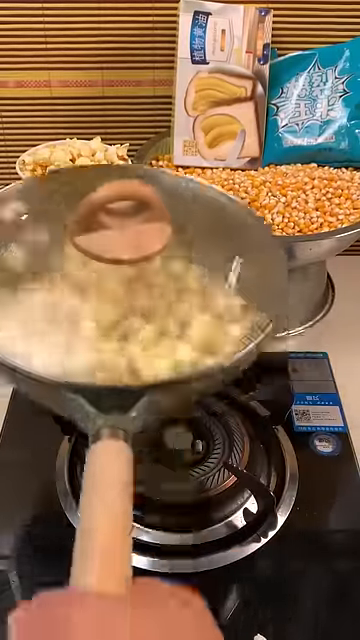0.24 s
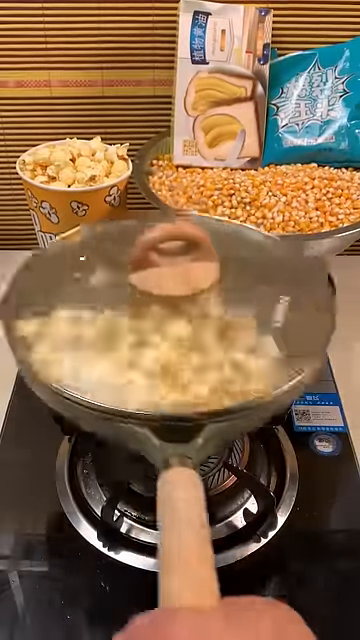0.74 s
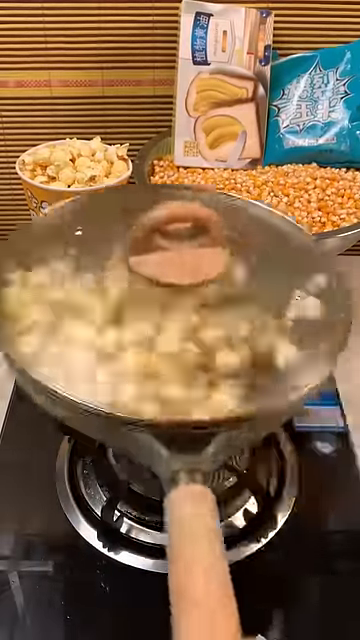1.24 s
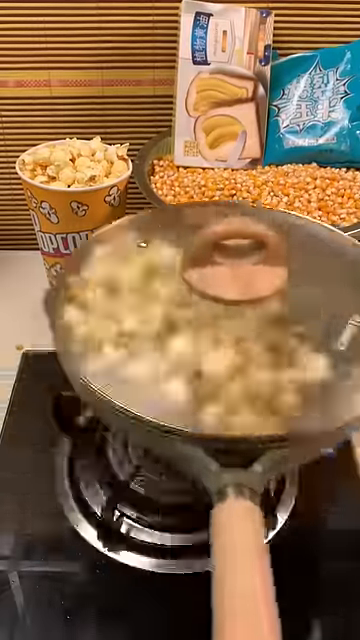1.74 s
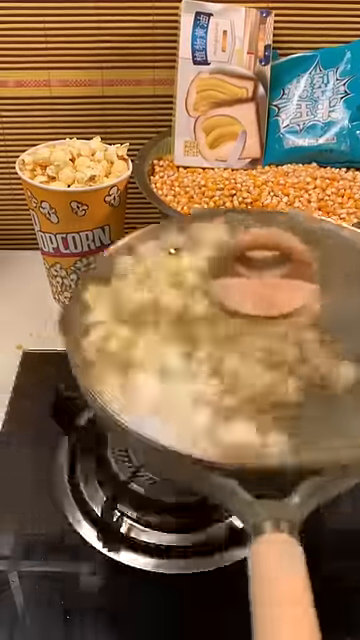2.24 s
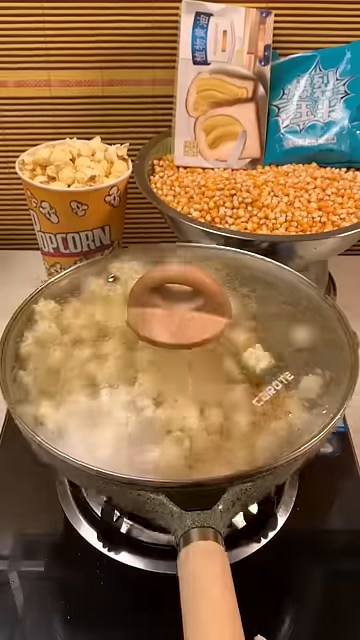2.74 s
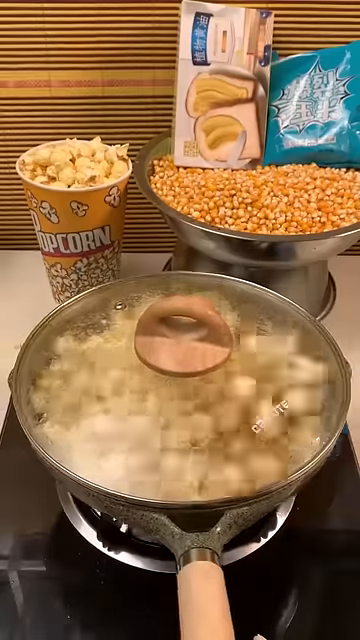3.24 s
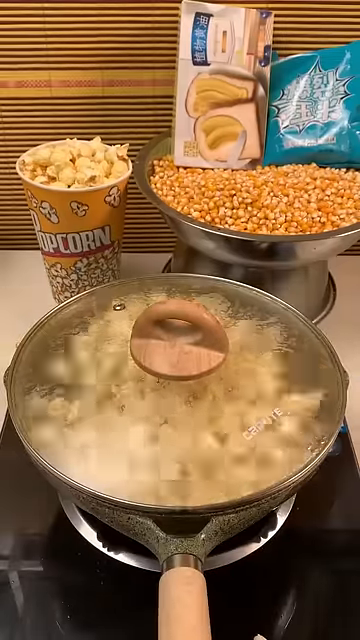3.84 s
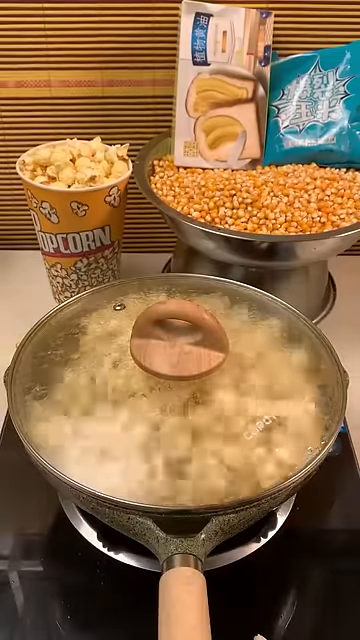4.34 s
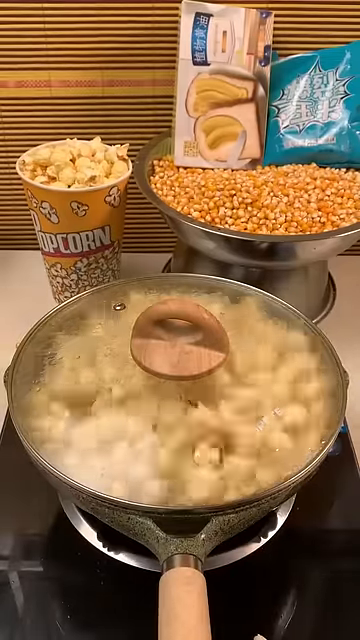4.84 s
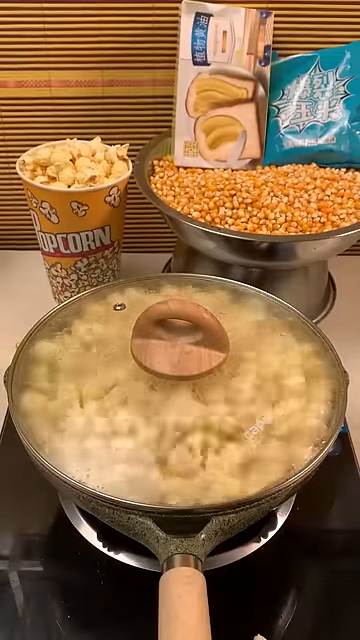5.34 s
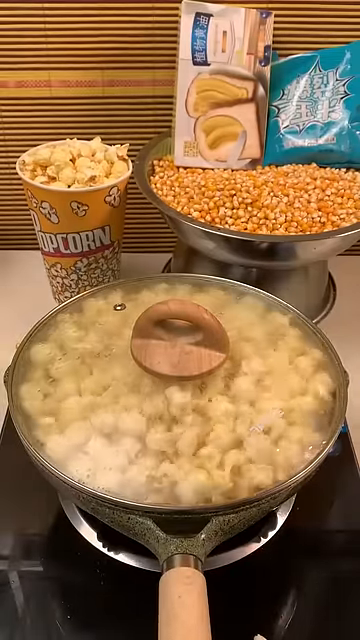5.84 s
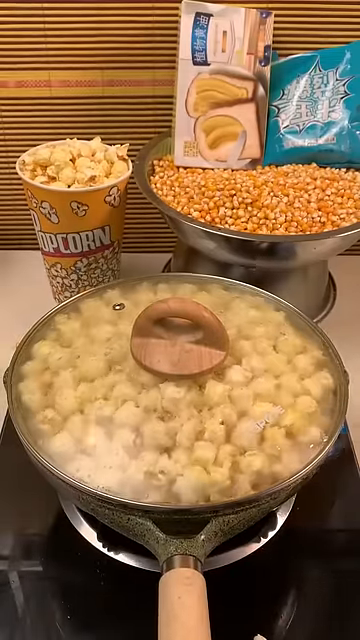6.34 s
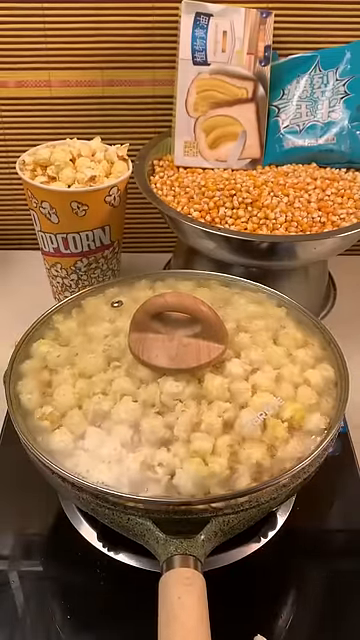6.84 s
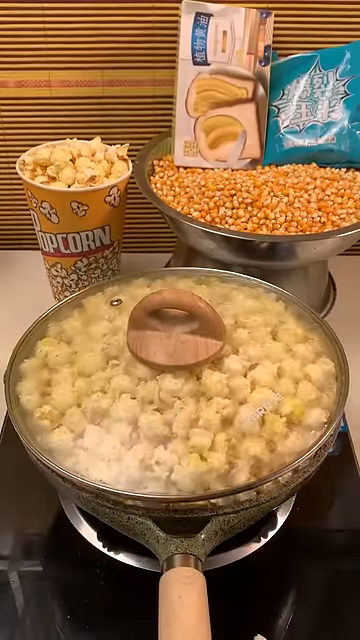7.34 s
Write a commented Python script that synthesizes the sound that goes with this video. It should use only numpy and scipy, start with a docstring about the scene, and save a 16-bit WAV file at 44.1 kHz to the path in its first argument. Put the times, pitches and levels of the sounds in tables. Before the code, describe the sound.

Popcorn bursts in hot oil under a pan lid, sharp scattered pops and a metallic bang thickening into dense, thumping crackle.

```python
"""A small kitchen, close by the hob, one channel: popcorn pops in hot oil in a frying pan under a glass lid.
The pan is shaken, bangs on the burner grate and is put down; then the popping thickens over a low gas flame.
Pops are shaped noise bursts through pan and lid resonances; each also kicks the pan with a few low cycles.
Thumps are sinking sines, knocks narrow noise, taps a lid mode; oil and steam are random ticks over hiss.
As corn covers the bottom, then packs against the lid, pops grow longer and the lighter thumps rise in pitch."""
import sys
import numpy as np
from scipy import signal
from scipy.fft import rfft, irfft, next_fast_len
from scipy.io import wavfile
from scipy.ndimage import uniform_filter1d, map_coordinates

SR = 44100
rng = np.random.default_rng(int(sys.argv[2]) if len(sys.argv) > 2 else 0)


def waveform_to_disk(signal):
    """Save audio, clipped to [-1, 1], as 16-bit WAV at the path in sys.argv[1]."""
    frames = np.transpose(np.atleast_2d(signal))
    scaled = np.clip(frames, -1, 1) * 32767
    samples = np.round(scaled).astype(np.int16)
    wavfile.write(sys.argv[1], SR, samples)


N = 334278  # length in samples

# Event and bed levels below are before the gain of their layer, which scene() sets.

# How slowly varying levels lie between the pops.
# Each row: time in seconds, tumbling corn in dB, frying oil in dB, steam in dB.
SIMMER = [(0, -62.5, -51, -55), (0.4, -62.5, -48, -49.5), (0.56, -62, -47.5, -54), (0.7, -65, -56, -49.5),
          (1.102, -62, -62, -57), (1.7, -62, -42.5, -47.5), (2.25, -67, -47.5, -48.5),
          (2.83, -63, -45, -48), (2.98, -71, -55.5, -62), (3.15, -70, -62, -58), (3.451, -46.5, -45.5, -56),
          (3.75, -93, -50, -52.5), (4.06, -81, -62, -55), (4.2, -63, -48, -45.5), (4.75, -50, -55, -48.5),
          (5.45, -47.5, -57, -49.5), (5.8, -52.5, -53.5, -49), (5.93, -62, -57, -47),
          (6.15, -37, -47.5, -41.5), (6.37, -47, -64, -49.5), (6.5, -37, -47, -44), (6.75, -39.5, -51, -52),
          (7.33, -38.5, -66, -54), (7.58, -40, -72, -72)]
# Shakes slide the corn through the hot oil. Each row: centre in seconds, half length in seconds, sizzle in dB.
SLIDES = [(0.274, 0.061, -44), (0.797, 0.07, -39), (1.228, 0.05, -42), (1.417, 0.3, -43),
          (1.888, 0.062, -41), (2.402, 0.078, -56), (2.567, 0.06, -44.5)]
# The heap heaves, rumbles and lets out steam.
# Each row: peak in seconds, decay in seconds, rumble in dB, steam in dB.
HEAVES = [(0.965, 0.058, -35, -44), (3.232, 0.062, -35.5, -42.5), (3.39, 0.04, -47, -62),
          (3.892, 0.055, -37.5, -41.5), (4.12, 0.04, -46, -45.5), (4.551, 0.078, -44, -56),
          (4.976, 0.067, -36.5, -37.5), (5.13, 0.13, -52, -31.5), (6.436, 0.037, -33, -33)]
# The clearest bursting kernels. Each row: time in seconds, crack level in dB, lid ring in dB re the crack,
# steam hiss in dB re the crack, flake pitch in Hz.
POPS = [(0.067, -33.5, -0.5, -11, 3180), (0.1204, -27, 3.5, 6, 2600.0), (0.246, -23, 1.5, -13.5, 6050),
        (0.305, -32, -2, -5, 3100), (0.349, -34.5, -12, 1, 4560), (0.395, -39, -21, -9, 3300.0),
        (0.424, -44, 2, 11, 3830), (0.5019, -22.5, -9.5, -17, 3500), (0.778, -36, 2, 4, 3060),
        (1.182, -24.5, -12, 1.5, 4240), (1.2145, -22, -18, 1, 4830), (1.3609, -17.5, -5.5, 2.5, 5750),
        (1.473, -33, -4, 0, 3200.0), (1.603, -42.5, 2, 12.5, 2900.0), (1.6364, -29, -20, 2.5, 3860),
        (1.6729, -25.5, -10, 2, 4500.0), (1.7572, -15, -3, -1, 3980), (1.796, -28, -3, 2, 6800),
        (1.844, -24.5, -2, 3, 2920), (2.121, -32.5, -12, 3, 5870), (2.247, -30.5, -1.5, 4.5, 5230),
        (2.321, -30, -6, 1, 3870), (2.342, -31, -16, -15, 3230), (2.487, -35, -22, 7, 6900),
        (2.534, -36, 4.5, 7, 3700.0), (2.694, -32.5, 3.5, 4, 6660), (2.761, -33, 4, -4, 3200.0),
        (2.861, -30, -12, 5, 5300), (3.0241, -38.5, -21, 10.5, 7300), (3.21, -31.5, -1, -26, 3160),
        (3.2314, -44, 12, -16.5, 2800.0), (3.273, -34.5, 5.5, -2, 2600.0), (3.365, -37, 0, 5, 4000.0),
        (3.4012, -33.5, 1, 4, 5530), (3.47, -38.5, 4, -2, 4000.0), (3.544, -40, 1, 12, 5270),
        (3.623, -35.5, -5.5, 5.5, 3940), (3.753, -45, 10, 10, 2530), (3.857, -38.5, 7, 6.5, 3180),
        (3.872, -36, 4, -3, 2520), (3.8955, -35.5, 5, -1, 5970), (3.9426, -37, 4, 11, 2250),
        (4.014, -43.5, 7, 15, 3140), (4.121, -39, 0, -10, 5440), (4.224, -43, 2, 19, 4730),
        (4.2784, -43, 14.5, 7, 3620), (4.385, -45.5, 8.5, 12.5, 5530), (4.542, -46.5, 12.5, 16, 2300.0),
        (4.584, -39, 7.5, 9, 7250), (4.604, -35.5, 3.5, -3, 5540), (4.638, -41, -5, 13.5, 6150),
        (4.682, -46, 9, 4, 7200.0), (4.736, -39, -3, 3, 2430), (4.765, -42, 10.5, -2, 6040),
        (4.837, -46.5, 12, 12, 7200.0), (4.858, -34.5, -4, -2, 2570), (4.895, -42, 4.5, 8, 7260),
        (4.964, -38.5, -5, 10, 3750), (5.021, -38, 1, 9, 6800), (5.112, -36, -5.5, 5, 6900),
        (5.143, -39.5, 7.5, 9, 7160), (5.308, -37, 5, 8, 3850), (5.357, -39, 6.5, 5.5, 6950),
        (5.38, -46, -15, 17, 6930), (5.4715, -35, -16, 0, 3700), (5.5979, -38, 5, 12.5, 4750),
        (5.837, -43, 9.5, 10.5, 7300), (5.859, -36, 1.5, 1, 7300), (6.0889, -33.5, -8, 4.5, 6460),
        (6.1282, -28.5, -4, 2, 2450), (6.215, -34, 2, 2, 7340), (6.257, -26, -5.5, -4, 3660),
        (6.279, -36, 5, 4, 3630), (6.297, -34.5, 7, -5, 5160), (6.439, -26.5, 1, -3, 3900),
        (6.4674, -29, -0.5, -15, 2390), (6.497, -30.5, 4, -14, 6200), (6.552, -36, 8, -1, 4380),
        (6.621, -28, -1, -4, 4930), (6.663, -27, -8, -5.0, 4970), (6.673, -26.5, 2, -9.0, 2460),
        (6.718, -27, -0.5, -13, 2500), (6.751, -31, 7, -0.5, 2500), (6.7968, -26.5, 5, -11, 6600),
        (6.835, -33, 5.5, 0.5, 5700.0), (6.873, -43, 10, 11.5, 4424), (6.891, -31, 7.5, -12, 4930),
        (6.917, -39, 10.5, 8.5, 5100.0), (6.936, -24.5, -1.5, -7.5, 2370), (6.992, -32.5, -6, -5, 5200.0),
        (7.014, -32, 11, -3.5, 4630), (7.026, -27, -2, -22, 2830), (7.041, -31.5, 8, 0, 5400),
        (7.055, -40, 7, -16, 5100.0), (7.072, -34, -8, -5, 6500), (7.092, -31.5, 3.5, -6, 4050),
        (7.146, -37, 4.5, -7, 3040), (7.169, -30.5, 1, -10, 3300), (7.2139, -36, 6, -4, 4840),
        (7.2384, -31, 0, -8, 2940), (7.282, -37, 0, 0, 2398), (7.298, -26, 0.5, -10, 6200),
        (7.312, -30.5, 0, 0.5, 5100), (7.3272, -31.5, 2, -5, 4460), (7.354, -41.5, 7, -3, 6900.0),
        (7.3914, -32, 0.5, 0, 5900), (7.454, -37, -30, 1.5, 5060), (7.494, -35.5, 7, 4.5, 5000),
        (7.54, -41.5, 9.5, 10.5, 4900.0), (7.567, -32, 2.5, -8, 3340)]
# Heavy thumps: corn thrown against pan and lid, and from 0.91 to 0.97 s the pan's blows on the grate. Each row:
# time in seconds, level in dB, initial pitch in Hz.
THUMPS = [(0.256, -26.5, 187.5), (0.286, -47, 157), (0.503, -51, 205), (0.913, -29, 385),
          (0.935, -32.5, 245), (0.956, -26.5, 272), (0.969, -32, 205), (1.21, -40, 173),
          (1.367, -39.5, 198), (1.392, -41, 208), (1.421, -41, 165), (1.479, -38, 192), (1.619, -32.5, 193),
          (1.657, -39.5, 211), (1.678, -36, 217), (1.824, -36.5, 243), (1.85, -35, 213), (1.88, -36.5, 211),
          (2.017, -44, 202), (2.327, -33.5, 214), (2.543, -34, 192), (2.763, -28.5, 243), (2.781, -36, 186),
          (3.213, -36, 246), (3.233, -30.5, 369), (3.318, -41.5, 296), (3.348, -31, 248), (3.416, -37, 239),
          (3.629, -38, 188), (3.652, -38.5, 225), (3.901, -33.5, 221), (3.93, -30, 236), (4.124, -35, 245),
          (4.27, -35.5, 226), (4.364, -39, 232), (4.39, -36.5, 203), (4.427, -36, 203), (4.506, -35, 245),
          (4.544, -34.5, 180), (4.583, -36, 319), (4.661, -34.5, 251), (4.751, -35, 213), (4.807, -33, 261),
          (4.918, -36, 213), (4.945, -40, 263), (4.985, -35.5, 305), (5.081, -37, 186), (5.144, -29, 287),
          (5.169, -30.5, 238), (5.213, -33.5, 210), (5.245, -44, 242), (5.285, -35, 274.5),
          (5.458, -32.5, 306), (5.579, -38, 303), (5.745, -38, 231), (5.839, -29.5, 233),
          (5.955, -31.5, 271), (5.986, -32.5, 251), (6.018, -37, 328), (6.052, -36, 167), (6.185, -40, 287),
          (6.211, -28, 285), (6.29, -27.5, 349), (6.34, -35.5, 254), (6.411, -33, 350), (6.435, -27, 384),
          (6.467, -27, 365), (6.5, -28, 356), (6.573, -34, 384), (6.604, -25, 421), (6.623, -23.5, 474),
          (6.668, -34, 550), (6.755, -36, 519), (6.796, -33, 509), (6.82, -34, 450), (6.848, -36, 472),
          (6.9, -37, 402), (6.992, -29.5, 366), (7.013, -22.5, 536), (7.05, -36.5, 485),
          (7.208, -31.5, 300), (7.252, -38, 247), (7.37, -25.5, 489), (7.395, -35, 440),
          (7.487, -32.5, 461.8), (7.568, -33, 401)]
# Hollow knocks of the pan and its loose lid. Each row: start in seconds, level in dB, pitch in Hz.
KNOCKS = [(0.12, -33, 1710), (0.245, -28, 1960), (0.894, -32, 1140), (0.905, -21.5, 1410),
          (1.182, -28.5, 1410), (1.399, -27, 1220), (1.492, -26, 780), (1.872, -24.5, 1160),
          (2.599, -33, 880), (2.675, -36.5, 890), (3.233, -27, 1100), (3.244, -23.5, 590),
          (3.411, -31, 1270), (3.49, -38, 720), (4.192, -35, 820), (4.307, -39.5, 840), (4.454, -27, 1490),
          (4.978, -27, 1090), (5.166, -28, 704), (5.31, -32.5, 1100), (5.542, -34.5, 930),
          (5.705, -32.5, 736), (5.729, -37, 1110), (5.95, -26.5, 1090), (5.978, -29, 1040),
          (6.465, -21.5, 1220), (6.618, -23, 1220), (7.17, -22.5, 1290), (7.366, -31, 603)]
# Flying flakes strike the lid and ring one of its modes. Each row: start in seconds, level in dB, pitch in Hz.
TAPS = [(0.498, -34, 1123), (1.755, -28, 1880), (1.873, -26.5, 1070), (2.243, -39, 1880),
        (2.534, -40, 1130), (2.857, -38, 1132), (3.621, -28.5, 1884), (4.753, -34.5, 1850),
        (4.992, -37, 1160), (5.236, -38, 1766), (5.44, -34, 1780), (5.601, -37, 1720), (6.121, -32, 1080),
        (6.139, -31, 1050), (6.17, -33, 1720), (6.273, -33, 1066), (6.371, -38.5, 1700), (6.408, -33, 1080),
        (6.449, -27, 1130), (6.6, -30, 1180), (6.668, -26.5, 1195), (6.741, -29, 1960), (7.224, -30, 1250),
        (7.244, -31, 1177), (7.483, -33, 1220)]
# The pan meets the grate: a chattering bang, later the putting down. Each row: start in seconds, level in dB.
BANG = [(0.893, -32), (0.907, -22), (0.913, -20), (0.918, -27), (0.925, -19), (0.939, -28), (0.953, -29.5),
        (3.213, -39), (3.233, -45)]
# Corn filling the pan lowers the resonances that colour the pops. Each row: time in seconds, frequency ratio.
FILL = [(0, 0.95), (3.6, 0.94), (4.6, 0.93), (6.2, 0.917), (6.7, 0.89)]

# Resonances of the lidded pan, before the fill ratio. Each row: centre in Hz, width in Hz, level in dB.
PAN_MODES = [(1220, 41, 4.5), (1942.6, 170, 3.5), (2570, 89, -2.5), (3310, 130, -3.5), (3876, 160, -2.5),
             (4596, 143, -4.5), (5156, 100, -7.5), (5510, 206, -6), (6770, 250, -4.5), (7770, 250, -8),
             (8390, 360, -2), (9510, 250, -3), (10930, 1100, -4.5), (12360, 810, -5), (13900, 300, -10)]
# Modes of the hob's sheet, scattered at each contact. Each row: mean pitch in Hz, level in dB.
HOB_MODES = [(198, -4), (325, -14), (395, -4.5), (495, -10.5)]
# Where flakes tap the lid. Each row: centre in Hz, width in Hz, gain in dB for the squared resonance.
LID_MODES = [(1110, 78, -5.5), (1758, 260, 10), (3280, 62, -11)]
# Relative spectra. Each row: frequency in Hz, level in dB.
# Sound going straight out past the lid:
DIRECT_SPECTRUM = [(300, -19), (750, -65), (1100, -2.5), (2200, -13), (4000, -13.5), (6000, -8),
                   (10000, -11.5), (15500, -11.5)]
# The grate rattling on:
RATTLE_SPECTRUM = [(1000, -2), (2500, -2), (5000, 1), (6500, 9), (8300, 5), (10000, -20), (15000, -27)]
# The pan touching the grate:
GRATE_SPECTRUM = [(290, -35), (500, -3), (1160, -14), (1400, -22), (2130, -14.5), (3200, -4), (3700, -13),
                  (8210, -4), (14000, -12), (15100, -14), (16000, -45)]
# Frying oil, before the lidded pan colours it:
OIL_SPECTRUM = [(500, -34), (780, -1), (1100, -2), (1450, 1.5), (1850, 2), (2200, -5), (2550, 6),
                (3300, 10.5), (5000, 5.5), (6500, 7), (9000, -2.5), (14000, -19)]
# Escaping steam, before the lidded pan colours it:
STEAM_SPECTRUM = [(3000, -86), (5800, -10.5), (7500, 3), (9000, -4), (10500, 3), (13500, -8), (15500, 7)]
# The rush of the gas flame:
BURNER_SPECTRUM = [(15, -45), (30, -30), (48, 8), (61, 8.5), (75, 1), (120, 0), (250, -44), (600, -24),
                   (1500, -29), (6000, -90)]
# Decay of the kitchen's tail. Each row: frequency in Hz, time to fall by 60 dB in seconds.
KITCHEN_DECAY = [(150, 0.22), (500, 0.17), (2000, 0.21), (6000, 0.14), (10000, 0.18), (15000, 0.11)]

# What changes as the pan fills. Each row: value for a bare, a covered and a packed pan.
# Length scale of a pop, in seconds:
POP_LENGTH_S = (0.00422, 0.00681, 0.0085)
# How abruptly a pop ends (exponent, higher is more abrupt):
TAIL_SHAPE = (0.62, 0.75, 0.9)
# Direct sound out of the pan, in dB:
DIRECT_DB = (-2, -0.5, 5.5)
# A pop's ring in the lid's upper mode, in dB re that pop's crack and ring levels:
LID_RING_DB = (-11, -6.5, -7)
# Mean pitch of that mode, in Hz:
LID_UPPER_HZ = (1882, 1828, 1920)
# Small pops a second:
SMALL_POPS_PER_S = (4, 12, 16)
# Mean level of small pops, in dB:
SMALL_POP_DB = (-50, -49.5, -48)
# Lid ring of small pops, in dB re their crack:
SMALL_RING_DB = (1, 7, 4)
# Steam hiss of small pops, in dB re their crack:
SMALL_HISS_DB = (-8, 8, 3)
# Push of a strong pop on the pan, in dB:
KICK_DB = (-56, -39, -39.5)
# Light thumps a second:
LIGHT_THUMPS_PER_S = (4, 12, 20)
# Central pitch of kicks and light thumps, in Hz:
THUMP_HZ = (204, 303, 460)

# popped corn first covers the bottom of the pan, later packs against the lid
COVER_FROM_S, COVER_TAKES_S = 2.2, 1.36
PACK_FROM_S, PACK_TAKES_S = 6.33, 0.328
SLIDE_CORN_DB, SLIDE_STEAM_DB = -24, -3  # re the sizzle
HEAVE_ATTACK_S, HEAVE_OIL_DB = 0.043, -1  # the oil spits, re the rumble
# scatters of pitch are in natural-log units
SMALL_FLAKE_HZ, FLAKE_SCATTER = 4010, 0.52
THUMP_SCATTER, LIGHT_THUMP_DB = 0.229, -5.5  # level re the tumbling corn
# first snap of a hull: its level scale, and the pop length over which it fades
SNAP_DB, SNAP_LENGTH_S = 6, 0.0025
# a kick follows its pop, and grows by this many dB per dB above a strong pop
KICK_DELAY_S, STRONG_POP_DB, KICK_GROWS = 0.00468, -29, 1
LID_RING_S, LID_ATTACK_S = 0.0073, 0.001488  # decay and rise of a tap on the lid
TOP_HZ = 15650  # band limit of the recorder


def amp(db):
    """Decibels to gain."""
    return 10 ** (np.asarray(db) / 20)


def unit(x):
    """Scale to rms 1."""
    return x / np.sqrt(np.mean(x ** 2) + 1e-20)


def along(points, hz):
    """(Hz, value) points joined on a log axis."""
    f, v = np.transpose(points)
    return np.interp(np.log(hz + 1), np.log(f + 1), v)


def filtered(x, response):
    """x times a response of frequency."""
    m = next_fast_len(len(x) + SR // 20)
    return irfft(rfft(x, m) * response(np.fft.rfftfreq(m, 1 / SR)), m)[:len(x)]


def noise(size, response):
    """Coloured noise of rms 1."""
    return unit(filtered(rng.standard_normal(size), response))


def add(track, s, sound):
    """Mix a sound into the track from time s."""
    start = round(s * SR)
    part = sound[max(-start, 0):max(N - start, 0)]
    track[max(start, 0):][:len(part)] += part


def resonance(hz, centre, width):
    """One causal resonance with peak gain 1."""
    return 1j * hz * width / (centre ** 2 - hz ** 2 + 1j * hz * width)


def ripple(hz, spacing_hz):
    """A smooth random curve over frequency, of about unit size."""
    place = hz / spacing_hz
    return map_coordinates(rng.standard_normal(200), [place], mode="mirror")


def covered(s):
    """0 while the bottom of the pan is bare, 1 once popped corn covers it."""
    return np.clip((s - COVER_FROM_S) / COVER_TAKES_S, 0, 1)


def fullness(s):
    """0 while the corn lies loose, 1 once it is packed up against the lid."""
    return np.clip((s - PACK_FROM_S) / PACK_TAKES_S, 0, 1)


def staged(values, s):
    """A quantity that moves from its bare-pan value to its covered and then its packed value."""
    bare, covering, packed = values
    return bare + (covering - bare) * covered(s) + (packed - covering) * fullness(s)


def stragglers(rates, spread_db):
    """Times and level offsets of small random events, more of them as the pan fills."""
    slot, chance, size = rng.random((200, 3)).T
    # one random moment in each of 200 equal slots
    s = (np.arange(len(slot)) + slot) / len(slot) * N / SR
    keep = chance < staged(rates, s) * N / SR / len(s)
    return zip(s[keep], spread_db * (2 * size[keep] - 1))


def lidded_pan(hz, direct_db):
    """Sound from inside the pan: partly straight out, partly through its resonances."""
    ring = sum(amp(db) * resonance(hz, centre, width) for centre, width, db in PAN_MODES)
    highpass = 1 / (1 + (900 / (hz + 1)) ** 8)
    return ring * highpass + amp(along(DIRECT_SPECTRUM, hz) + direct_db)


def burner(level_db, hum_db):
    """The low, steady rush of the gas flame, which also sounds the hollow of the pan."""
    rush = noise(N, lambda hz: amp(along(BURNER_SPECTRUM, hz)))
    hollow = noise(N, lambda hz: resonance(hz, 1062, 91) ** 2)
    return amp(level_db) * rush + amp(hum_db) * hollow


def simmering(s):
    """Levels of tumbling corn, frying oil and steam at time s, in dB."""
    times, *columns = np.transpose(SIMMER)
    return [np.interp(s, times, column) for column in columns]


def ticks(rate, spread_db):
    """Random tiny impacts of uneven size, rate a second, rms 1."""
    hits = rng.random(N) < rate / SR
    signs = rng.choice([-1, 1], N)
    sizes = amp(spread_db * np.clip(rng.standard_normal(N), -2, 2))
    return unit(hits * signs * sizes)


def flurries(depth_db, size):
    """A gain that swells and sinks at random, over about size samples."""
    drift = unit(uniform_filter1d(rng.standard_normal(N), size=size))
    return unit(amp(depth_db * drift))


def tumbling(lumpy_db, patter_db):
    """Soft corn jostles in the pan and patters on the lid; its rumble turns higher once it is packed."""
    t = np.arange(N) / SR
    loose = noise(N, lambda f: resonance(f, 203, 230) ** 2 / (1 + (f / 520) ** 8))
    packed = noise(N, lambda f: (resonance(f, 357, 395) ** 2 + resonance(f, 533, 72) ** 2)
                   / (1 + (f / 680) ** 24))
    rumble = np.sqrt(1 - fullness(t)) * loose + np.sqrt(fullness(t)) * packed
    # the lid is hardly reached until the pan stands still and the corn heaps up
    reach = np.interp(t, [3.3, 4.6, 6.2, 6.7], [0.024, 1.0, 0.68, 0.14])
    lid = lambda f: sum(amp(db) * resonance(f, hz, width) ** 2 for hz, width, db in LID_MODES)
    patter = unit(filtered(ticks(rate=260, spread_db=4.0), lid))
    return flurries(lumpy_db, size=600) * rumble + amp(patter_db) * reach * patter


def fizz(spectrum, rate, spread_db, hiss_db, flutter_db):
    """Tiny bubbles burst in flurries over a smooth hiss, heard through the lid."""
    bubbles = ticks(rate, spread_db) + amp(hiss_db) * rng.standard_normal(N)
    source = flurries(flutter_db, size=700) * bubbles
    return filtered(source, lambda hz: amp(along(spectrum, hz)) * lidded_pan(hz, direct_db=-11))


def patchy(x, depth_db, size):
    """Bands of the sizzle swell and fade at random over about size frames."""
    z = signal.stft(x, nperseg=256)[2]
    across_bands = uniform_filter1d(rng.standard_normal(z.shape), size=5, axis=0)
    field = uniform_filter1d(across_bands, size=size, axis=1)
    return unit(signal.istft(z * amp(depth_db * unit(field)))[1][:N])


def short_echo(x, strength):
    """A short reflection combs the sizzle's spectrum; it nearly vanishes after 3.4 s."""
    gain = strength * np.interp(np.arange(N) / SR, [3.15, 3.4], [1, .1])
    echo = filtered(x, lambda hz: np.exp(-2j * np.pi * hz / 2200))  # 1/2200 s later
    return (x - gain * echo) / np.sqrt(1 + gain ** 2)


def simmer(corn_db, oil_db, steam_db):
    """Corn tumbles, oil fries and steam escapes; each slide and heave of the corn stirs up all three."""
    t = np.arange(N) / SR
    corn, oil, steam = amp(simmering(t))
    slide = sum(amp(db) * np.exp(-((t - s) / length) ** 2) for s, length, db in SLIDES)
    corn = np.hypot(corn, amp(SLIDE_CORN_DB) * slide)
    oil = np.hypot(oil, slide)
    steam = np.hypot(steam, amp(SLIDE_STEAM_DB) * slide)
    for s, length, rumble_db, gush_db in HEAVES:
        swell = np.clip(1 + (t - s) / HEAVE_ATTACK_S, 0, 1) * np.exp(-np.maximum(t - s, 0) / length)
        corn = corn + amp(rumble_db) * swell
        oil = oil + amp(rumble_db + HEAVE_OIL_DB) * swell
        steam = steam + amp(gush_db) * swell
    tumble = corn * tumbling(lumpy_db=3.5, patter_db=-6.0)
    frying = fizz(OIL_SPECTRUM, rate=750, spread_db=6.5, hiss_db=-2.5, flutter_db=3.0)
    frying = oil * patchy(frying, depth_db=3, size=18)
    hissing = fizz(STEAM_SPECTRUM, rate=3300, spread_db=-5, hiss_db=17.0, flutter_db=4.0)
    hissing = steam * patchy(hissing, depth_db=1.8, size=8)
    frying = short_echo(frying, strength=0.042)
    hissing = short_echo(hissing, strength=0.47)
    return amp(corn_db) * tumble + amp(oil_db) * frying + amp(steam_db) * hissing


def kernels():
    """All pops, in the columns of POPS: the clear ones and small ones deep in the heap."""
    some_flake = lambda: SMALL_FLAKE_HZ * np.exp(FLAKE_SCATTER * rng.uniform(-1.2, 1))
    small = [(s, staged(SMALL_POP_DB, s) + offset, staged(SMALL_RING_DB, s), staged(SMALL_HISS_DB, s),
              some_flake())
             for s, offset in stragglers(SMALL_POPS_PER_S, spread_db=6)]
    return POPS + small


def flake(pitch, ring_db):
    """The response of one puffed flake: it rings briefly at its own pitch."""
    ring = amp(ring_db)
    return lambda hz: (1 + ring * resonance(hz, pitch, .11 * pitch)) / np.sqrt(1 + 0.23 * ring * (ring + 2))


def fragments(hz, spread, spacing_hz):
    """Pieces of hull, each with its own pitch, snap up to a few milliseconds apart."""
    delay = spread * np.clip(ripple(hz, spacing_hz), -2, 2)
    return np.exp(-2j * np.pi * np.cumsum(delay) * hz[1])  # phase from group delay


def lid_ring(hz):
    """One mode of the lid, tapped and quickly damped by the corn."""
    t = np.arange(SR // 12) / SR
    tone = np.sqrt(2) * np.sin(2 * np.pi * (hz * t + rng.random()))
    return tone * (1 - np.exp(-t / LID_ATTACK_S)) * np.exp(-t / LID_RING_S)


def pops(level_db, rise, fall, hull_db, hull_hz, grit_db, scatter):
    """Each hull splits with a snap and lets out a ragged puff of steam; the lid rings."""
    track, lead = np.zeros(N), 1 / 50  # each puff begins to swell before its peak
    t = np.arange(SR // 12) / SR - lead
    for s, db, ring_db, hiss_db, flake_hz in kernels():
        length = staged(POP_LENGTH_S, s)
        onset = np.exp(-np.abs(t / (rise * length)) ** 1.36)
        decay = np.exp(-np.abs(t / (fall * length)) ** staged(TAIL_SHAPE, s))
        puff = np.where(t < 0, onset, decay)
        grit = unit(uniform_filter1d(rng.standard_normal(len(t)), size=30))
        ragged = unit(amp(grit_db * grit))
        # the shorter the burst, the harder its snap
        snap = amp(SNAP_DB) * np.exp(-length / SNAP_LENGTH_S) * np.exp(-np.abs(t) / 0.0001)
        burst = (puff * ragged + snap) * rng.standard_normal(len(t))
        tilt = [(1900, ring_db), (2700, 0), (5800, 0), (8200, hiss_db)]
        ratio = np.interp(s, *np.transpose(FILL))
        # every hull has its own colour; a full pan lifts the lid and lets more sound straight out
        hull = lambda hz: amp(along(tilt, hz) + hull_db * ripple(hz, hull_hz))
        pan = lambda hz: lidded_pan(hz / ratio, staged(DIRECT_DB, s))
        # the longer the pop, the further its cracks fall apart
        spread = scatter * min(max(length - .003, 0), .006)
        body = flake(flake_hz, ring_db=6.5)
        pop = filtered(burst, lambda hz: hull(hz) * pan(hz) * body(hz) * fragments(hz, spread, spacing_hz=1329))
        add(track, s - lead, amp(db + level_db) * pop)
        upper_hz = staged(LID_UPPER_HZ, s) * rng.normal(1, 0.021)
        # the lid's own ring does not take the layer gain
        add(track, s - LID_ATTACK_S, amp(db + ring_db + staged(LID_RING_DB, s)) * lid_ring(upper_hz))
    return track


def blows():
    """All thumps, in the columns of THUMPS: heavy ones, the clear pops' kicks, light ones in tumbling corn."""
    kicks = [(s + KICK_DELAY_S, staged(KICK_DB, s) + KICK_GROWS * (db - STRONG_POP_DB))
             for s, db, *_ in POPS]
    light = [(s, simmering(s)[0] + LIGHT_THUMP_DB + offset)
             for s, offset in stragglers(LIGHT_THUMPS_PER_S, spread_db=0.5)]
    pitched = [(s, db, staged(THUMP_HZ, s) * np.exp(THUMP_SCATTER * rng.uniform(-1.135, 1)))
               for s, db in kicks + light]
    return THUMPS + pitched


def thumps(level_db, rise, fall, glide, after_db, after_fall, hob_db, hob_fall, edge_hz):
    """A soft blow gives a few sinking cycles; then the corn shudders and the hob gives a low push."""
    track, lead = np.zeros(N), 1 / 50
    t = np.arange(SR // 5) / SR - lead
    for s, db, hz in blows():
        decay = 1 / np.cosh(t / (fall + 0.00043 * fullness(s)))
        shape = np.where(t < 0, np.exp(-(t / rise) ** 2), decay)
        pitch = hz * np.exp(-glide * np.tanh(t / 0.0038))
        blow = np.sqrt(2) * shape * np.sin(2 * np.pi * (np.cumsum(pitch) / SR + rng.random()))
        swell = np.clip(t / 0.0069, 0, 1)
        shudder = noise(len(t), lambda f: resonance(f, hz, hz) ** 2) * swell * np.exp(-t / after_fall)
        # the lower the thump, the stronger the hob's push
        hob = noise(len(t), lambda f: resonance(f, 110.0, 87) ** 2) * swell * np.exp(-t / hob_fall) * 240 / hz
        add(track, s - lead, amp(db + level_db) * (blow + amp(after_db) * shudder + amp(hob_db) * hob))
    return filtered(track, lambda f: 1 / (1 + (f / edge_hz) ** 24))


def knocks(level_db, fall, width_hz):
    """Short, hollow, quickly damped knocks of resonant noise."""
    track, t = np.zeros(N), np.arange(SR // 8) / SR
    for s, db, hz in KNOCKS:
        ring = noise(len(t), lambda f: resonance(f, hz, width_hz) ** 2)
        add(track, s, amp(db + level_db) * ring * (1 - np.exp(-t / 0.003)) * np.exp(-t / fall))
    return track


def taps(level_db):
    """Round, pitched taps of corn on the lid."""
    track = np.zeros(N)
    for s, db, hz in TAPS:
        add(track, s, amp(db + level_db) * lid_ring(hz))
    return track


def bang(level_db, fall, rattle_db, rattle_fall, boom_db, boom_rise, boom_fall):
    """The pan chatters on the grate; the grate rattles on and the hob's sheet swells into a boom."""
    track, t = np.zeros(N), np.arange(SR // 2) / SR
    for s, db in BANG:
        contact = noise(len(t), lambda f: amp(along(GRATE_SPECTRUM, f))) * np.exp(-t / fall)
        rattle = noise(len(t), lambda f: amp(along(RATTLE_SPECTRUM, f)) * lidded_pan(f, direct_db=25))
        rattle = rattle * np.exp(-t / rattle_fall)
        modes = sum(amp(level) * np.sin(2 * np.pi * (hz * rng.normal(1, 0.0176) * t + rng.random()))
                    for hz, level in HOB_MODES)
        boom = modes * np.exp(-t / boom_fall) * (1 - np.exp(-t / boom_rise))
        add(track, s, amp(db + level_db) * (contact + amp(rattle_db) * rattle + amp(boom_db) * boom))
    return track


def kitchen(x):
    """The room's tail of decaying noise, drawn anew every quarter second."""
    wet, step = np.zeros(N), SR // 4
    for start in range(0, N, step):
        hz, t, z = signal.stft(rng.standard_normal(SR // 2), SR, nperseg=256)
        decay = amp(-60 * t / along(KITCHEN_DECAY, hz)[:, None])
        tail = signal.istft(z * decay * np.clip(t / 0.002, 0, 1), SR)[1]
        add(wet, start / SR, signal.fftconvolve(x[start:start + step], tail / np.linalg.norm(tail)))
    return wet


def scene():
    """Everything on the hob, with the room's answer; rises and falls of thumps, knocks and bang in seconds."""
    bed = simmer(corn_db=0.5, oil_db=-3.0, steam_db=1.5) + burner(level_db=-57.5, hum_db=-67.5)
    # rise and fall of pops are shares of their length
    cracks = pops(level_db=9.5, rise=0.68, fall=0.79, hull_db=3.5, hull_hz=568, grit_db=2.5, scatter=0.5)
    lows = thumps(level_db=4.0, rise=0.0037, fall=0.0018, glide=0.184, after_db=-3.5, after_fall=0.0052,
                  hob_db=-9, hob_fall=0.018, edge_hz=658)
    hollow = knocks(level_db=-2.0, fall=0.0069, width_hz=460) + taps(level_db=-2.5)
    landing = bang(level_db=-2.0, fall=0.0094, rattle_db=-12.5, rattle_fall=0.064,
                   boom_db=-9.5, boom_rise=0.015, boom_fall=0.051)
    # popped corn soaks up the ringing that the room gives back
    soak = amp(np.interp(np.arange(N) / SR, [3, 4.5, 6.5], [0, -4, -6]))
    send = amp(-7.5) * cracks + amp(-6.0) * lows + amp(-2.5) * hollow + amp(-5.5) * landing
    room = kitchen(soak * send)
    return (cracks + lows + hollow + landing + room + bed)[None]


def record(dry):
    """The recorder rounds off the hardest peaks and keeps nothing above its band limit."""
    top = .42  # level that the rounded peaks approach
    rounded = dry[0] / (1 + (dry[0] / top) ** 4) ** .25
    return filtered(rounded, lambda hz: hz < TOP_HZ)[None]


dry = scene()
out = record(dry)
waveform_to_disk(out)
```